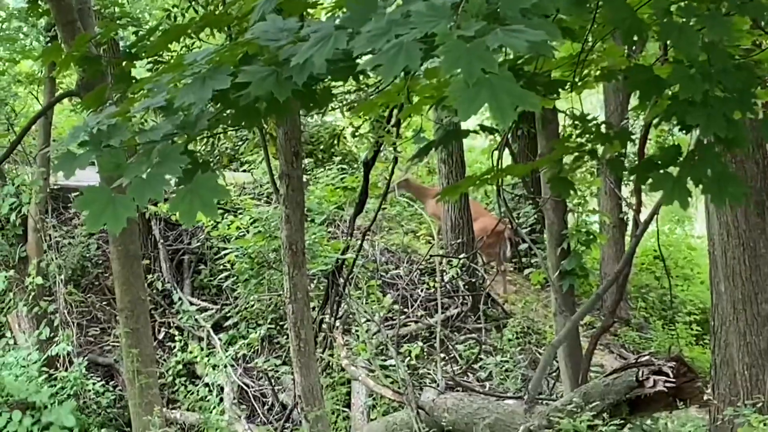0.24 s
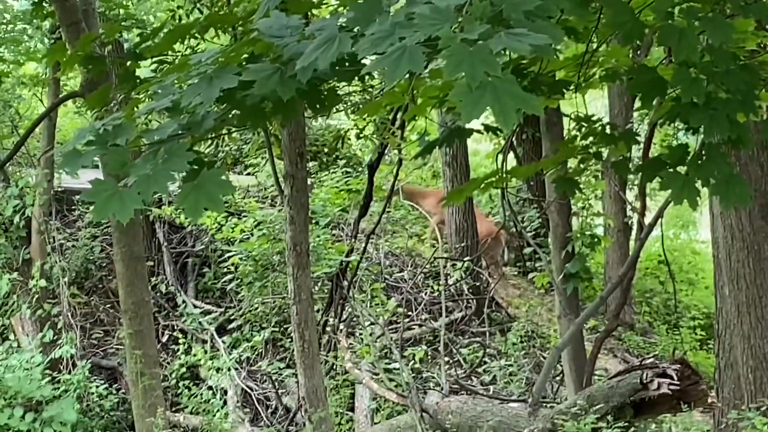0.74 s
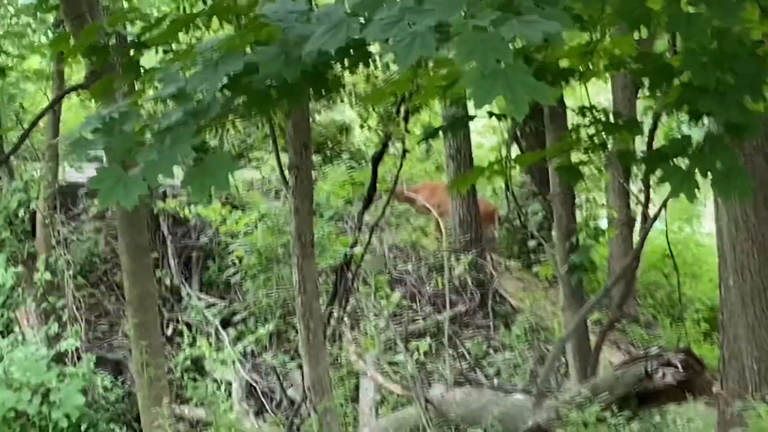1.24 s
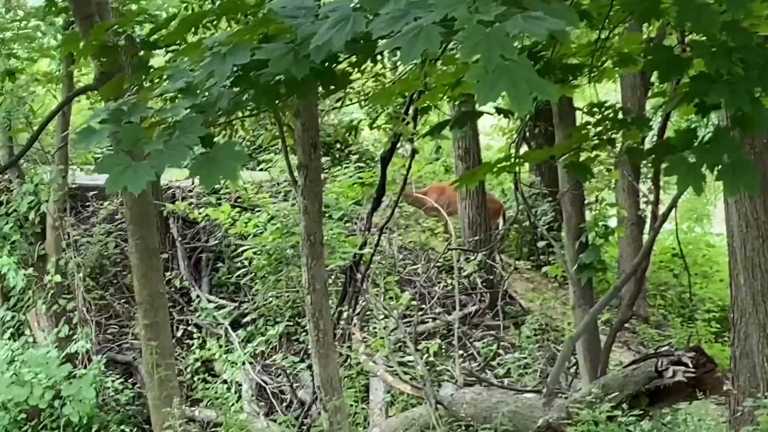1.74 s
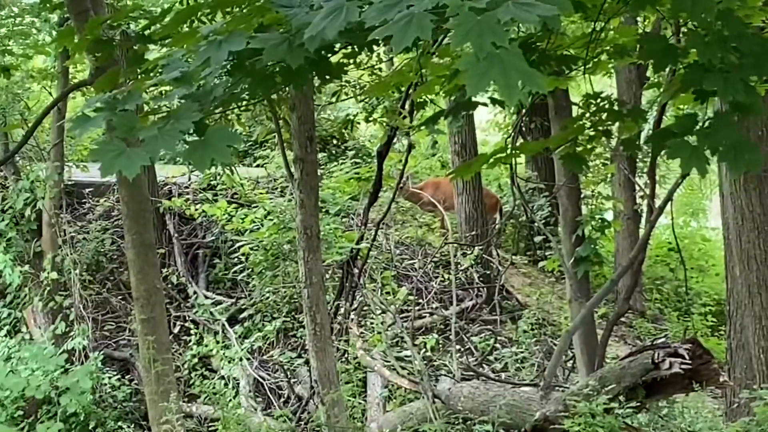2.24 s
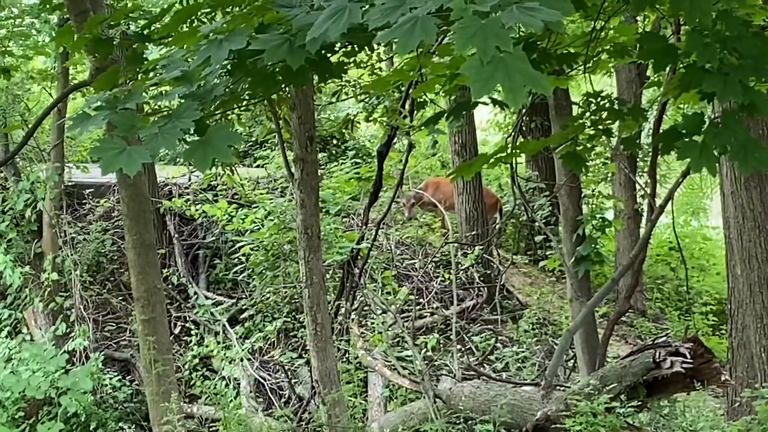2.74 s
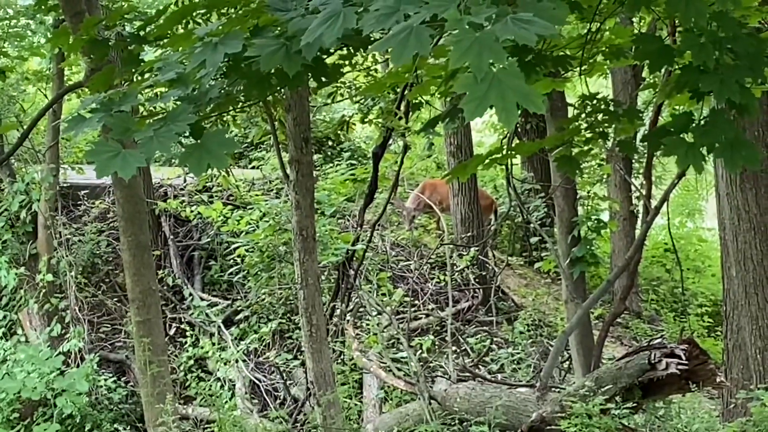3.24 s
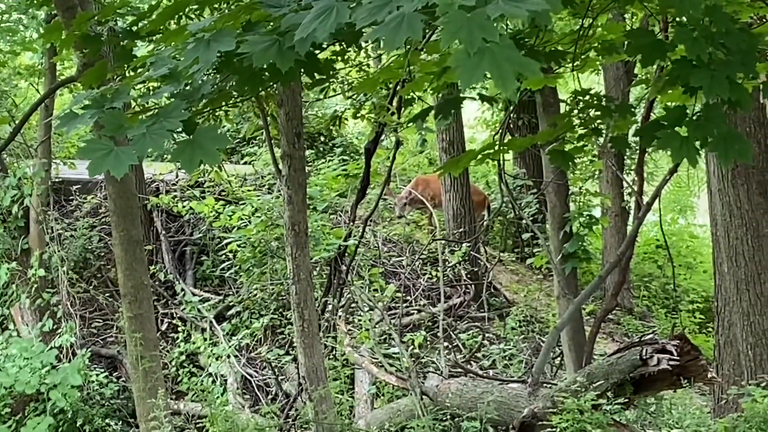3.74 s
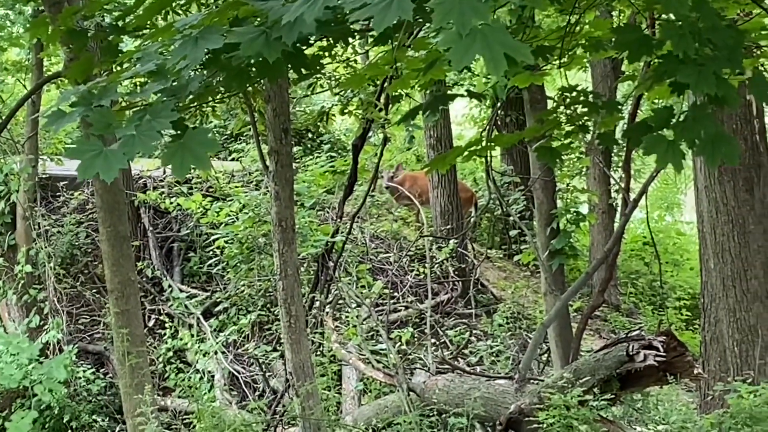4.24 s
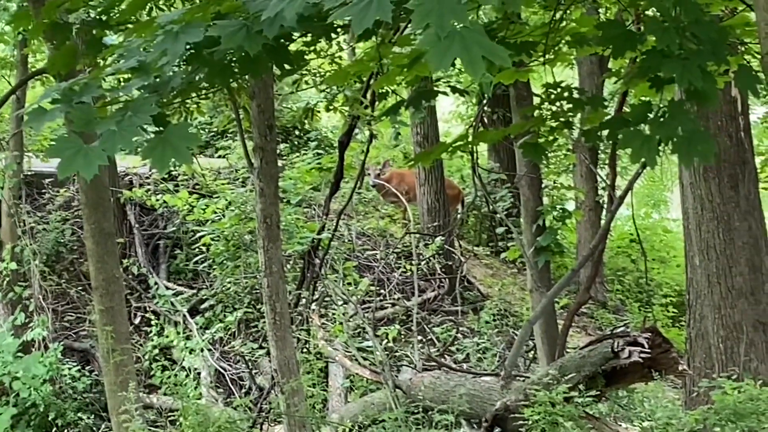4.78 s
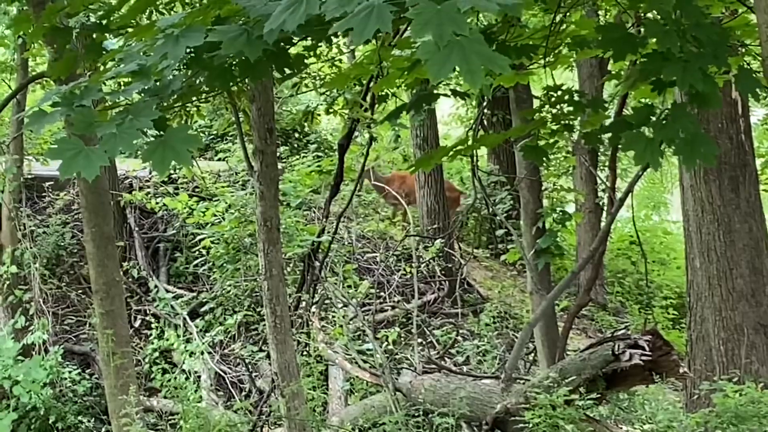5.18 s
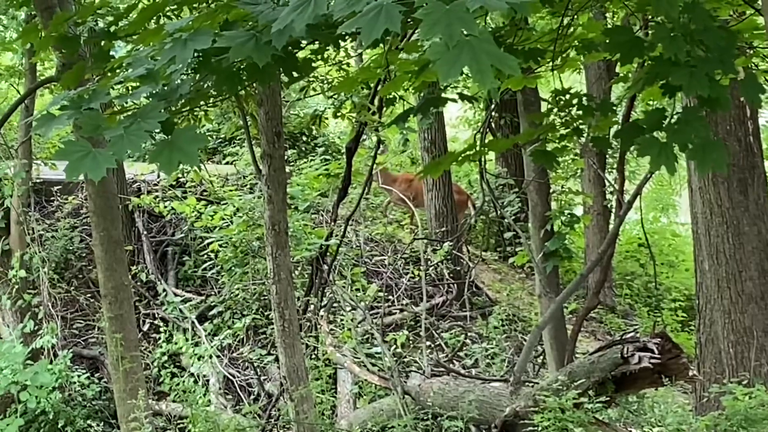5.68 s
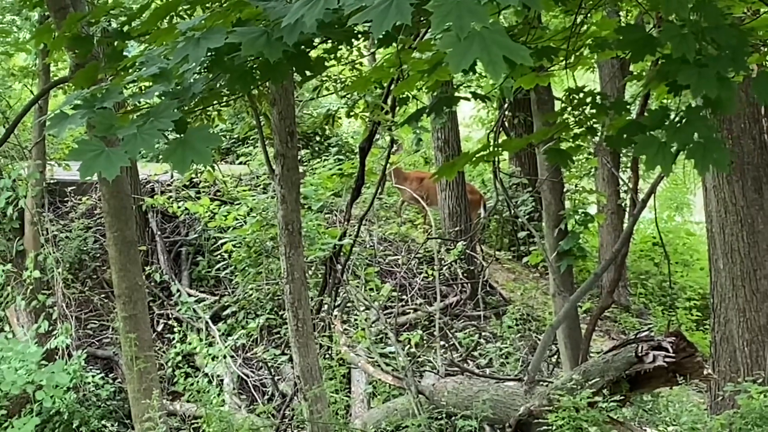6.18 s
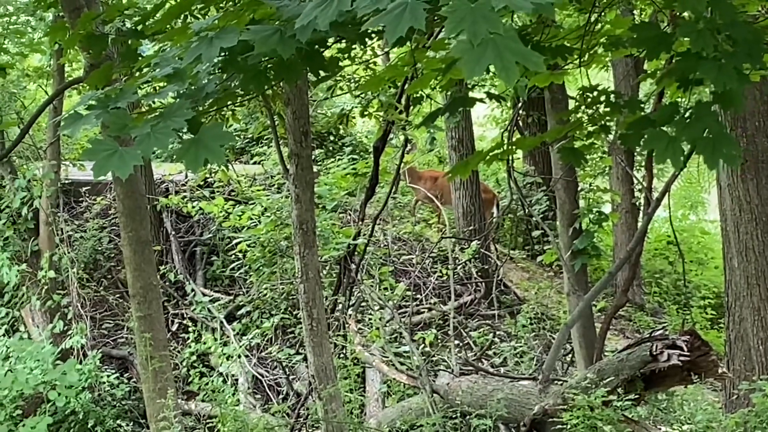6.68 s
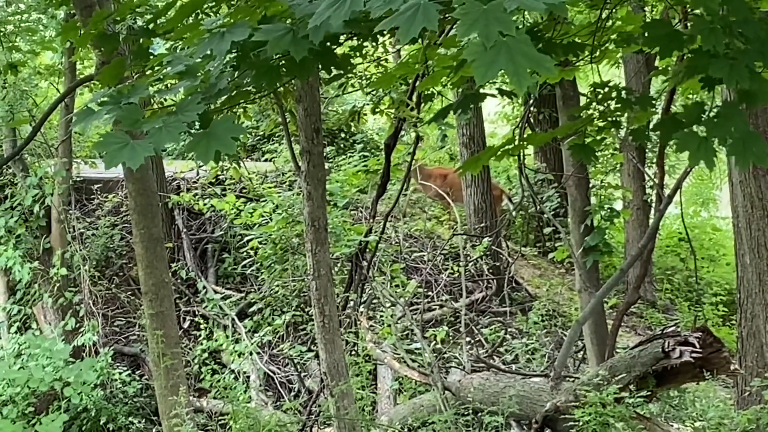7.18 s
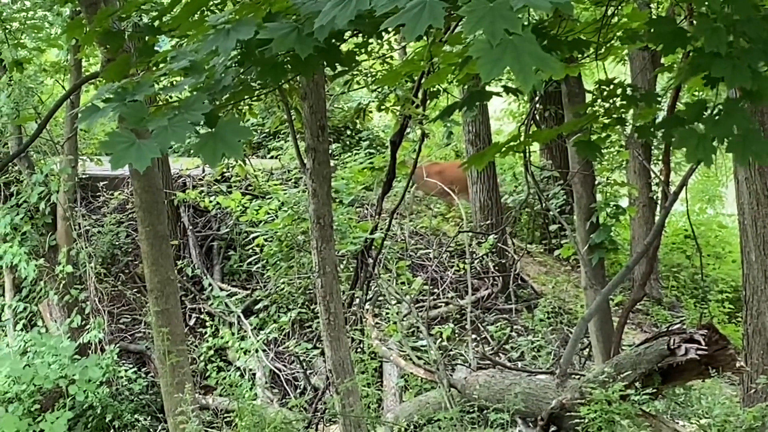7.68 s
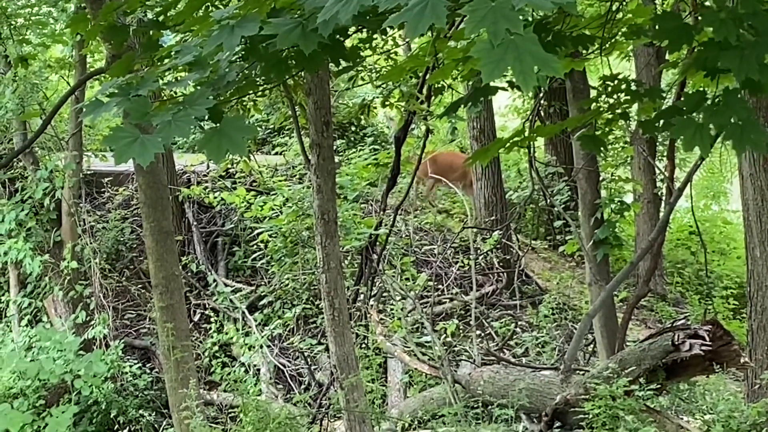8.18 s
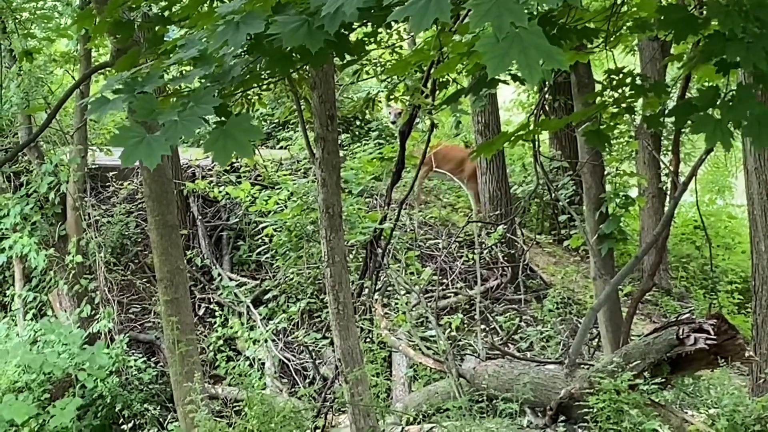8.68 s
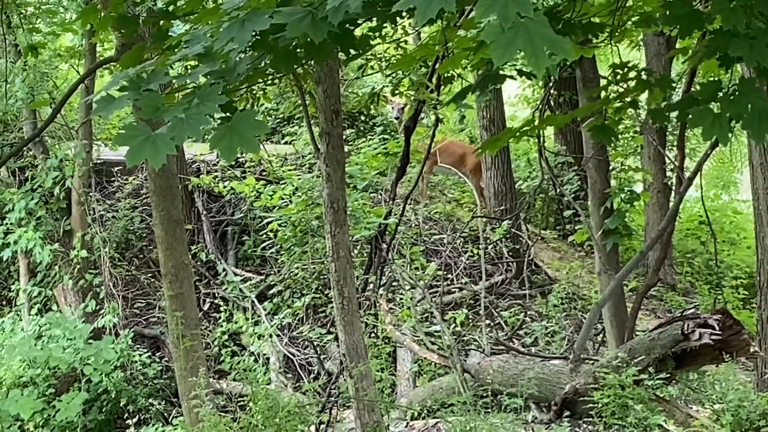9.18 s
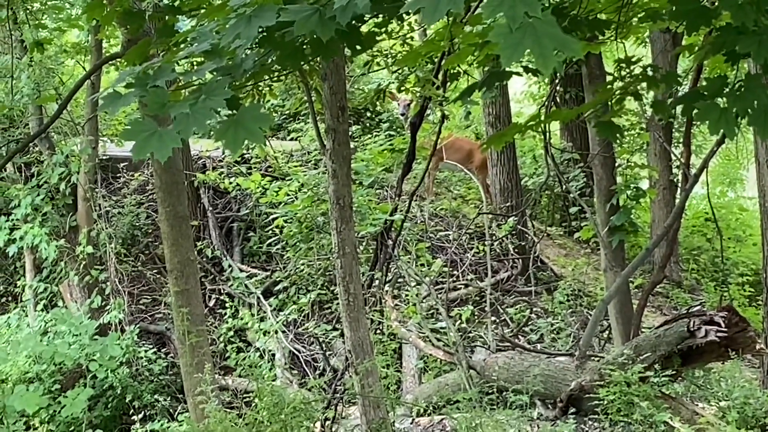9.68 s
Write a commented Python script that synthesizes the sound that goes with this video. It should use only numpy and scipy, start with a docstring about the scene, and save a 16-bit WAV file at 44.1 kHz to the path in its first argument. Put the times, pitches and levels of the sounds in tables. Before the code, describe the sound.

Leafy woods with sparrow-like cheeps and warbled whistles, a sharp handling knock near the start, and a low motor hum growing later.

```python
"""Small birds sing among trees: frequency-modulated sines give rough sparrow calls, clear whistles and
glides, all smeared by sparse decaying echoes off the trunks. An insect shrills as a narrow noise band.
Shaped noise makes far traffic and a wooded hiss; two wavering sines make an engine, louder as it nears.
A hand knocks the body of the phone: dispersed pulses and ringing modes, with rubbing noise around them."""
import sys
import numpy as np
from scipy import signal
from scipy.fft import rfft, irfft, next_fast_len
from scipy.io import wavfile
from scipy.ndimage import uniform_filter1d

SR = 44100
rng = np.random.default_rng(int(sys.argv[2]) if len(sys.argv) > 2 else 0)


def to_wav(sig):
    """Store sig (one row per channel, or 1-D mono) as 16-bit WAV at the path in sys.argv[1].

    Samples outside -1..1 are clipped; the rate is SR.
    """
    pcm = np.clip(np.atleast_2d(sig), -1, 1) * 32767
    pcm = np.round(pcm).astype(np.int16)
    wavfile.write(sys.argv[1], SR, pcm.T)  # frames by channels


N = 437472


def gain_of(db):
    """Logarithmic level: decibels to amplitude gain."""
    return 10 ** (np.asarray(db) / 20)


def evened(x):
    """Normalization: scales to rms 1."""
    return x / np.sqrt(np.mean(x ** 2) + 1e-20)


def read(points, hz):
    """Interpolation of a spectrum in dB on a log-frequency axis."""
    point_hz, value = np.transpose(points)
    return np.interp(np.log(hz + 1), np.log(point_hz + 1), value)


def curves(rows):
    """Linear interpolation of a table's columns at every sample."""
    seconds, *columns = np.transpose(rows)
    return [np.interp(np.arange(N) / SR, seconds, column) for column in columns]


def colour(x, points):
    """Linear filtering: multiplies the spectrum by a response, without phase shift."""
    response = gain_of(read(points, np.fft.rfftfreq(N, 1 / SR)))
    return irfft(rfft(x) * response, N)


def add(mix, start_s, sound):
    """Superposition: mixes a sound in at a time, cut off at the edges of the mix."""
    at = round(start_s * SR)
    part = mix[max(at, 0):][:len(sound) + min(at, 0)]
    part += sound[max(-at, 0):][:len(part)]


def wobble(count, smooth_s):
    """Low-passed noise: a smooth random curve of rms 1."""
    size = max(round(smooth_s * SR), 1)
    once = uniform_filter1d(rng.standard_normal(count), size)
    return evened(uniform_filter1d(once, size))


def power_of(points, hz, db):
    """Power spectral density of a given shape, scaled to a total level over time."""
    shape = gain_of(read(points, hz)) ** 2
    return shape[:, None] / shape.sum() * gain_of(db) ** 2


LONGEST = SR  # samples of noise drawn for each note, enough for the longest


def voice(rows, warble, hiss_db, overtones=()):
    """Frequency modulation: a sine on a randomly warbled pitch curve; a faint broad hiss follows the note."""
    seconds, hz, db = np.transpose(rows)
    t = np.arange(seconds[0], seconds[-1], 1 / SR)
    shake = wobble(LONGEST, 0.0008)[:len(t)]
    hiss = np.diff(rng.standard_normal(LONGEST))[:len(t)]
    turns = np.cumsum(np.interp(t, seconds, hz) * (1 + warble * shake)) / SR
    tone = np.sin(2 * np.pi * turns)
    for multiple, overtone_db in overtones:
        tone = tone + gain_of(overtone_db) * np.sin(2 * np.pi * multiple * turns)
    fade = np.clip(np.minimum(t - seconds[0], seconds[-1] - t) / 0.0011, 0, 1)
    level = np.sqrt(2) * gain_of(np.interp(t, seconds, db))
    return level * (tone + gain_of(hiss_db) * hiss) * fade


# harmonics of the rough calls: multiple, level_db relative to the fundamental
OVERTONES = [(2, -22.5), (3, -41)]


def calls(shape, events, warble, hiss_db):
    """Scaling of one call: each repeat has its own strength, pitch and speed, on three perches in turn."""
    out = np.zeros((3, N))
    for k, (start_s, db, pitch, speed) in enumerate(events):
        rows = np.array(shape) * [1 / speed, pitch, 1] + [0, 0, db]
        add(out[k % len(out)], start_s, voice(rows, warble, hiss_db, OVERTONES))
    return out


# pitch and level contour of a cheep: time_s, pitch_hz, level_db (relative; repeats rescale all three)
CHEEP_SHAPE = [(0, 4030, -10), (.015, 5160, -8), (.05, 4730, -6.5), (.1, 4230, -4), (.15, 3720, -17),
               (.17, 3470, -3)]
# cheeps: start_s, level_db, pitch_factor, speed_factor
CHEEP_CALLS = [(-.08, -51.5, 1.04, 1.3), (1.645, -50.5, 0.95, 1.35), (2.304, -51.5, 0.95, 1.15),
               (3.77, -51.5, 0.94, 1.13), (5.371, -51, 0.96, 1.47), (8.015, -53.5, 0.93, 1.07),
               (8.8, -55, 0.91, 0.84), (8.931, -58, 0.95, 1.6), (9.82, -54.5, 0.95, 1.3)]


def cheeps():
    """Strong random frequency modulation spreads each harmonic into a rough band."""
    return calls(CHEEP_SHAPE, CHEEP_CALLS, warble=0.09, hiss_db=-30.5)


# insect noise band: time_s, level_db, centre_hz
INSECT_BAND = [(0, -80, 5700), (.4, -81.5, 5670), (1.5, -81.5, 5700), (3, -82.5, 5750), (4.5, -79, 5750),
               (6, -80, 5830), (7, -80, 5850), (8.5, -83.5, 5940), (9.92, -76, 5850)]


def insect():
    """Quadrature modulation: slow noise on a cosine and a sine makes a narrow band at a drifting centre."""
    db, hz = curves(INSECT_BAND)
    turns = np.cumsum(hz) / SR
    band = wobble(N, 0.0011) * np.cos(2 * np.pi * turns)
    band += wobble(N, 0.0033) * np.sin(2 * np.pi * turns)
    return gain_of(db) * np.array([band, band[::-1]])  # time reversal decorrelates the second part


# engine level: time_s, first_order_db, second_order_db
ENGINE_LEVELS = [(0, -54, -62.5), (1.05, -50, -72.5), (1.7, -60.5, -62), (2.13, -54, -86), (3.4, -64, -81),
                 (4.4, -54.5, -64), (5.45, -61, -69), (6.2, -50.5, -61), (6.42, -42.5, -57),
                 (6.85, -50, -61.5), (7.18, -48.5, -65), (7.76, -41.5, -66), (8.07, -44.5, -66),
                 (8.4, -39.5, -69), (8.9, -43, -71), (9.3, -50.5, -68), (9.67, -44.5, -67),
                 (9.92, -54, -69)]
# engine firing rate before its random wobble: time_s, rate_hz
FIRING_RATE = [(0, 96.5), (3.7, 94), (5.5, 97), (6.7, 99.5), (7.8, 98), (8.5, 95.3), (9.2, 93.2),
               (9.92, 91)]


def engine():
    """Harmonic excitation: firing rate and its double, wavering on their way through the air."""
    first_db, second_db = curves(ENGINE_LEVELS)
    turns = np.cumsum(curves(FIRING_RATE)[0] * (1 + 0.0067 * wobble(N, 0.048))) / SR
    waver = gain_of(1.7 * wobble(N, 0.028) + 0.87 * wobble(N, 0.12))
    first = gain_of(first_db) * waver
    second = gain_of(second_db) * waver[::-1]
    orders = [first * wave(2 * np.pi * turns) + second * wave(4 * np.pi * turns)
              for wave in (np.sin, np.cos)]
    return np.sqrt(2) * np.array(orders)


# far traffic level: time_s, rumble_db, wash_db
TRAFFIC_LEVELS = [(0, -44, -53), (.35, -51.5, -55.5), (1.4, -39.5, -55), (1.8, -46.5, -64.5),
                  (2.2, -47.5, -60), (2.8, -45, -54), (3.4, -48.5, -56.5), (4.1, -52, -56.5),
                  (5.1, -48, -55), (5.7, -54, -54.5), (6.4, -45.5, -53.5), (6.75, -39.5, -55),
                  (7.5, -40, -53), (8.8, -40, -56.5), (9.92, -39.5, -56)]
# relative spectral density of rumble and of wash: frequency_hz, density_db
RUMBLE_SPECTRUM = [(15, -51.5), (30, -24), (42, 0.5), (60, -2.5), (80, -4), (140, -21), (300, -31.5),
                   (2000, -110)]
WASH_SPECTRUM = [(60, -28.5), (130, 2.5), (190, -3.5), (290, -11.5), (650, -10.5), (1000, -21.5),
                 (1500, -49.5), (2500, -40), (6000, -100)]
# far chorus and leaves blurred to a hiss, relative density: frequency_hz, density_db
HISS_SPECTRUM = [(900, 1), (1500, -6), (2200, -3.5), (2800, -3.5), (4000, -9.5), (5100, -17), (6400, -23),
                 (7300, -17.5), (7800, -22), (9800, -35.5), (12000, -27), (14000, -47.5)]


def background():
    """Random-phase synthesis: Gaussian short-time spectra for rumble, wash and hiss, in drifting patches."""
    hz = np.fft.rfftfreq(1024, 1 / SR)
    a, b, c, d, patches = rng.standard_normal((N // 256 + 5, 513, 5)).T
    seconds, rumble_db, wash_db = np.transpose(TRAFFIC_LEVELS)
    t = np.arange(a.shape[1]) * 256 / SR
    power = power_of(RUMBLE_SPECTRUM, hz, np.interp(t, seconds, rumble_db))
    power += power_of(WASH_SPECTRUM, hz, np.interp(t, seconds, wash_db))
    power = power + power_of(HISS_SPECTRUM, hz, -63)
    patches = uniform_filter1d(patches, size=10, axis=0)  # across frequency
    patches = evened(uniform_filter1d(patches, size=16, axis=1))  # across time
    noise = np.array([a + 1j * b, c + 1j * d])
    spectra = noise * np.sqrt(power / 2) * gain_of(2.23 * patches)
    return signal.istft(spectra, nperseg=1024, noverlap=768)[1][:, :N]


def note(start_s, seconds, hz, db):
    """Near-pure tone: start and sound of a clear note with faint warble and very little hiss."""
    return start_s, voice(np.transpose([seconds, hz, db]), warble=0.0073, hiss_db=-47.0)


# held peeps: start_s, length_s, pitch_hz, level_db (at the peak)
PEEPS = [(.03, 0.06, 5780, -47.5), (.9, 0.14, 7120, -70.5), (4.215, 0.033, 3603, -53.5),
         (4.348, 0.04, 3270, -58.5), (5.21, 0.12, 3950, -67), (5.64, 0.27, 3870, -68),
         (5.99, 0.28, 3845, -67), (6.27, 0.3, 5330, -73.5), (6.6, .27, 5260, -73), (7.6, 0.54, 3665, -64),
         (7.88, 0.071, 5450, -61.5), (8.14, 0.13, 5380, -57.5), (8.3, 0.031, 2190, -61.5),
         (8.44, 0.084, 5250, -65), (8.62, 0.11, 3190, -60), (8.66, .09, 5250, -64),
         (8.72, 0.15, 2670, -58.5), (9.48, 0.04, 2204, -56.5), (9.57, 0.074, 1983, -68),
         (9.5, .06, 3160, -61), (9.53, 0.053, 4477, -52), (9.82, 0.019, 4470, -46)]
PEEP_RISE_S, PEEP_START_DB, PEEP_FADE_DB = 0.011, -8.5, -13.5  # levels relative to the peak
PEEP_SAG = 0.008  # share of the pitch lost by the end


def peeps():
    """Amplitude envelope: a steady tone swells fast, then fades while its pitch sags."""
    return [note(start_s, [0, PEEP_RISE_S, length_s], [hz, hz, hz * (1 - PEEP_SAG)],
                 [db + PEEP_START_DB, db, db + PEEP_FADE_DB])
            for start_s, length_s, hz, db in PEEPS]


# contour of a low chuck: time_s, pitch_hz, level_db (relative; repeats rescale all three)
CHUCK_SHAPE = [(0, 3295, -6), (.01, 2705, 9), (.03, 2100, 5), (.055, 1796, -5)]
# chucks: start_s, level_db, pitch_factor, speed_factor
CHUCK_CALLS = [(0.091, -76, 0.91, 2.4), (.76, -65.5, 1.07, 1.12), (2.97, -67.5, 0.92, 1.17),
               (4.56, -72, 1.1, 1.1), (5.679, -71, 1.11, 1.08), (6.372, -68, 1.21, 1.05),
               (6.459, -83, 1.5, 1.45), (6.63, -63, 1.2, 1.01), (7.429, -64, 1.1, 0.98),
               (8.852, -64, 1.42, 1.01), (9.502, -62, 1.14, 1.1)]


def chucks():
    """Very strong random frequency modulation turns a short falling tone almost to noise."""
    return calls(CHUCK_SHAPE, CHUCK_CALLS, warble=0.17, hiss_db=-35)


# knocks, relative level of each part: start_s, blow_db, thump_db, rattle_db, tick_db
KNOCKS = [(0.309, -77, -54, -47.5, -39.5), (0.557, -49, -55, -69, -61), (0.947, -22, -35, -39, -64),
          (0.97, -44, -53, -41, -78), (1.003, -48, -57, -49, -69), (1.181, -28.5, -36, -61, -56),
          (1.215, -3, -18, -17, -31), (1.369, -41.5, -61, -53, -62), (1.452, -43, -41, -70, -73),
          (1.519, -40.5, -35, -48.5, -67), (1.556, -32, -50.5, -40.5, -63), (1.667, -17.5, -29, -23.5, -54),
          (1.748, -70, -56, -54, -51), (2.585, -31, -48.5, -45, -73), (2.772, -57, -39, -70, -79),
          (2.798, -55, -41, -56, -80), (3, -48, -45, -37, -72), (3.061, -43.5, -44, -68, -68),
          (3.078, -30.5, -31.5, -64, -70), (3.098, -54, -34.5, -72, -75), (3.133, -70, -36, -72, -75),
          (3.172, -70, -42.5, -72, -75), (3.522, -26, -41, -45, -62)]
# what each part sends through the body, relative: frequency_hz, level_db
THUMP = [(30, 4.3), (75, 20.6), (140, 14.9)]
BLOW = [(280, 2), (560, -3.5)]
RATTLE = [(950, 3.5), (1250, -8)]
TICK = [(1850, -2), (2600, -14), (4300, -16.5), (7000, -23), (14000, -40)]
# modes left ringing by blow and rattle: frequency_hz, level_db (relative to the part), t60_s
BLOW_MODES = [(294, -5, 0.021), (574.5, -7, 0.033)]
RATTLE_MODES = [(827, 1.5, 0.019), (977, -1, 0.029)]
DULLING = 0.2  # dB of top treble a knock loses for each dB its blow is weaker


def knocks():
    """Dispersion: bending waves carry treble first and bass later; damped modes ring on."""
    out = np.zeros(N)
    t, hz = np.arange(8192) / SR, np.fft.rfftfreq(8192, 1 / SR)
    late = np.exp(-2j * np.pi * 1.409 * np.log(1 + hz))  # each frequency comes 1.409 of its cycles late
    for start_s, blow_db, thump_db, rattle_db, tick_db in KNOCKS:
        parts = (THUMP, thump_db), (BLOW, blow_db), (RATTLE, rattle_db), (TICK, tick_db)
        shock = [(f, db + part_db) for points, part_db in parts for f, db in points]
        dull_db = DULLING * blow_db * np.clip(hz / 2500 - 1, 0, 1)
        pulse = irfft(gain_of(read(shock, hz) + dull_db) * late)
        add(out, start_s, 40 * pulse * np.clip(2 - t / 0.093, 0, 1))
        for modes, part_db in (BLOW_MODES, blow_db), (RATTLE_MODES, rattle_db):
            for f, db, t60 in modes:
                decay = gain_of(part_db + db - 60 * t / t60)
                onset = 1 - np.exp(-t * f / 1.1)
                add(out, start_s, decay * onset * np.sin(2 * np.pi * f * t))
    return out


# contour of a chirrup: time_s, pitch_hz, level_db (relative; repeats rescale all three)
CHIRRUP_SHAPE = [(0, 4900, -24), (.025, 5365, -5), (.031, 4000, -7), (.045, 4600, -1), (.062, 4200, 1.5),
                 (.076, 4300, 1), (.082, 3450, 0.5), (.11, 2792, -2.5), (.14, 3293, -3), (.165, 2806, -8),
                 (.185, 2972, -22)]
# chirrups: start_s, level_db, pitch_factor, speed_factor
CHIRRUP_CALLS = [(.558, -58, 1.0, 0.88), (2.955, -58, 0.97, 0.88), (4.551, -58, 1.01, 1.01),
                 (6.553, -60.5, 0.99, 0.83)]


def chirrups():
    """Random frequency modulation roughens a longer call whose pitch zigzags downward."""
    return calls(CHIRRUP_SHAPE, CHIRRUP_CALLS, warble=0.045, hiss_db=-33.0)


# rubbing noise around knocks, one a short swell into the loudest: start_s, length_s, start_db, end_db
RUBS = [(0.932, 0.05, -47, -57), (1.148, 0.047, -51, -43), (1.198, .015, -46.5, -18),
        (1.224, 0.08, -36.5, -49), (1.624, .046, -51, -44), (1.681, 0.051, -36, -60)]
# relative spectral density of the rubbing: frequency_hz, density_db
RUB_SPECTRUM = [(60, -8), (200, 0.5), (550, 4), (950, -6), (1300, -15.5), (2200, -27), (6000, -62)]


def rubbing():
    """Amplitude-modulated noise: coloured noise whose strength flutters at random, in short ramps."""
    out = np.zeros(N)
    flutter = gain_of(4.3 * wobble(N, 0.0057))
    rub = evened(colour(rng.standard_normal(N) * flutter, RUB_SPECTRUM))
    for start_s, length_s, start_db, end_db in RUBS:
        at = np.arange(round(start_s * SR), round((start_s + length_s) * SR))
        level = gain_of(np.linspace(start_db, end_db, len(at)))
        out[at] += rub[at] * level * signal.windows.tukey(len(at), 0.2)
    return out


# long falling glides: start_s, length_s, top_hz, bottom_hz, level_db (at the peak)
GLIDES = [(1.113, 0.54, 6130, 3668, -57), (1.925, 0.32, 4640, 3145, -53), (7.188, 0.45, 6110, 3660, -55)]
GLIDE_DROP, GLIDE_DROP_S = 0.52, 0.0098  # share of the fall done at once, its time constant
GLIDE_SETTLE = 0.75  # share of the length before the pitch is level
GLIDE_START_DB, GLIDE_END_DB = -9.5, -15.5  # relative to the peak


def glide(start_s, length_s, top_hz, bottom_hz, db):
    """Exponential plus linear fall: drops fast, slides to a level pitch, loudest where it settles."""
    u = np.linspace(0, 1, 40)
    fast = GLIDE_DROP * np.exp(-u * length_s / GLIDE_DROP_S)
    slow = (1 - GLIDE_DROP) * np.maximum(1 - u / GLIDE_SETTLE, 0)
    hz = bottom_hz + (top_hz - bottom_hz) * (fast + slow)
    swell_db = np.interp(u, [0, GLIDE_SETTLE, 1], [GLIDE_START_DB, 0, GLIDE_END_DB])
    return note(start_s, u * length_s, hz, db + swell_db)


# warbled song: start_s, start_hz, turn_s (after the start), turn_hz, length_s, end_hz, level_db (at the turn)
SYLLABLES = [(2.805, 2920, 0.024, 2720, 0.055, 3020, -61.5), (2.839, 2950, .025, 3010, 0.077, 3000, -57),
             (2.915, 3050, .015, 3050, .04, 3100, -62.5), (2.897, 1900, 0.013, 2200, 0.037, 2910, -67),
             (3.23, 2904, 0.025, 2716, 0.046, 2970, -56), (3.267, 2990, 0.016, 3054, 0.035, 3050, -54),
             (3.308, 1842, .03, 3110, .07, 2990, -58), (3.394, 3104, 0.029, 2740, .055, 2240, -53.5),
             (3.731, 2840, 0.038, 2987, 0.06, 2765, -49.5), (3.798, 2770, .015, 2720, .035, 2860, -54.5),
             (3.869, 3200, 0.045, 2073, 0.051, 2410, -50), (4.25, 2820, 0.037, 2237, 0.051, 2280, -53.5),
             (4.315, 3610, 0.013, 3470, 0.044, 3240, -64), (4.827, 3810, 0.004, 3900, 0.0082, 3710, -61),
             (4.92, 3980, .015, 4300, 0.031, 4670, -69.5), (8.128, 1833, 0.05, 2110, 0.058, 1960, -61.5),
             (8.534, 4140, 0.011, 3127, 0.12, 2995, -56), (8.59, 3060, 0.05, 2643, .11, 2575, -56.5),
             (8.707, 2600, 0.046, 1940, .07, 2180, -61), (8.747, 5070, 0.022, 4090, 0.028, 3770, -52),
             (9.126, 3730, 0.024, 3515, 0.045, 2330, -55.5), (9.159, 2320, .012, 2150, 0.047, 2100, -56.5),
             (9.232, 2110, .02, 2350, 0.039, 2610, -53.5), (9.282, 3126, 0.039, 2830, 0.063, 2540, -54),
             (9.348, 2550, 0.012, 2474, 0.029, 2290, -53), (9.712, 3010, 0.032, 3220, 0.052, 3180, -58),
             (9.77, 2580, 0.018, 2200, 0.04, 2230, -52.5), (9.864, 2387, 0.012, 2270, 0.037, 2240, -58.5)]
SYLLABLE_START_DB, SYLLABLE_END_DB = -2, 1.5  # relative to the turn


def syllables():
    """Piecewise-linear frequency sweep: each syllable has a single turn in its pitch."""
    return [note(start_s, [0, turn_s, length_s], [start_hz, turn_hz, end_hz],
                 [db + SYLLABLE_START_DB, db, db + SYLLABLE_END_DB])
            for start_s, start_hz, turn_s, turn_hz, length_s, end_hz, db in SYLLABLES]


def shaped(shape, events):
    """Scaling of one clear contour in level, pitch and speed."""
    seconds, hz, shape_db = np.transpose(shape)
    return [note(start_s, seconds / speed, hz * pitch, shape_db + db)
            for start_s, db, pitch, speed in events]


# contour of a soft rising whistle: time_s, pitch_hz, level_db (relative; repeats rescale all three)
RISE_SHAPE = [(0, 2430, -4), (.15, 2704, 4.5), (.28, 2780, -18)]
# rising whistles: start_s, level_db, pitch_factor, speed_factor
RISE_CALLS = [(5.04, -74, 1, 1.25), (5.33, -69, 1.04, 1.15), (5.651, -68.5, 1.03, 1.04),
              (5.982, -70.5, 1, 1.1), (8.201, -67.5, 1.02, 1.8)]


def rises():
    """Slow upward frequency sweep at a soft level."""
    return shaped(RISE_SHAPE, RISE_CALLS)


# contour of a steep swoop: time_s, pitch_hz, level_db (relative; repeats rescale all three)
SWOOP_SHAPE = [(0, 5680, -2.5), (.04, 7460, -6), (.068, 6440, -7), (.08, 5400, 0), (.097, 4050, -17.5),
               (.14, 4980, -9.5), (.175, 5240, -11)]
# swoops: start_s, level_db, pitch_factor, speed_factor
SWOOP_CALLS = [(7.756, -62.5, 0.91, 1), (8.011, -51.5, 1.015, 0.96), (8.254, -47.5, .99, .99),
               (8.505, -46.5, 1.007, 1)]


def swoops():
    """Fast frequency sweep: up, steeply down and up again."""
    return shaped(SWOOP_SHAPE, SWOOP_CALLS)


def whistles():
    """Superposition of the clear notes, dealt in turn to three perches."""
    out = np.zeros((3, N))
    notes = peeps() + [glide(*row) for row in GLIDES] + syllables() + rises() + swoops()
    for k, (start_s, sound) in enumerate(notes):
        add(out[k % len(out)], start_s, sound)
    return out


def trees(perches, t60, rise_s):
    """Multiple scattering: sparse decaying echoes, one set per perch and one for the stereo difference."""
    taps, t = np.zeros((4, SR)), np.arange(SR) / SR
    at = np.arange(40, SR - 20, 20) + rng.integers(0, 20, (4, (SR - 41) // 20))  # one in 20 samples
    np.put_along_axis(taps, at, rng.choice([-1., 1.], at.shape), 1)
    taps *= gain_of(-60 * t / t60) * (1 - np.exp(-t / rise_s))
    taps /= np.linalg.norm(taps[0])
    size = next_fast_len(N + SR)
    heard, echoes = rfft(perches, size), rfft(taps, size)
    shared = (heard * echoes[:-1]).sum(0)
    apart = heard.sum(0) * echoes[-1]
    return irfft([shared, apart], size)[:, :N]


# what foliage lets through on the direct path: frequency_hz, level_db
LEAVES = [(2000, -2.5), (3300, -4), (4200, -7.5), (7000, -19)]
# what trunks and leaves scatter, high notes most: frequency_hz, level_db
SCATTER = [(2000, -6.5), (3200, -2.5), (4200, -0.5), (7000, -1.5)]


def birds():
    """Direct and reverberant sound: calls come mostly as echoes; the chucks are nearer and drier."""
    clear = whistles()
    rough = cheeps() + chirrups()
    near = chucks()
    scattered = colour(clear, SCATTER) + gain_of(5.0) * rough + gain_of(1.0) * near
    out = trees(scattered, t60=0.73, rise_s=0.0011)
    direct = colour(clear.sum(0), LEAVES) + gain_of(-1.5) * rough.sum(0) + near.sum(0)
    out[0] += direct
    return out


def handling():
    """Phase quadrature: the stereo difference of knocks and rubbing lags by a quarter cycle."""
    touch = knocks() + rubbing()
    return np.array([touch, irfft(-1j * rfft(touch), N)])


# stereo width by frequency, wide near 1.4 kHz, almost mono from 4 to 6.5 kHz: frequency_hz, level_db
STEREO_WIDTH = [(60, -24.5), (170, -12), (490, -11.5), (840, -6.5), (1410, 3.5), (2000, -10.5),
                (2600, -11.5), (4060, -33.5), (6500, -53), (7800, 1)]


def scene():
    """Sum and difference stereo: a part shared by both channels, and a part of opposite sign."""
    shared, apart = birds() + insect() + engine() + background() + handling()
    apart = colour(apart, STEREO_WIDTH)
    return np.array([shared + apart, shared - apart])


# overall tone, thin deep bass, a narrow gap near 9 kHz, weak above 13 kHz: frequency_hz, level_db
OVERALL_TONE = [(15, -27), (32, -11), (50, 0), (6000, 0.5), (7400, -4), (7800, -4), (8600, -7.5),
                (9050, -39), (9700, 1.5), (12200, -1.5), (13000, -22), (15000, -19.5)]
EDGE_HZ = 15300  # upper band limit


def record(dry):
    """Linear filtering and band limiting: sets the overall tone, then a low-pass cuts the extreme top."""
    edge = signal.firwin(255, EDGE_HZ, window=("kaiser", 9), fs=SR)
    return signal.oaconvolve(colour(dry, OVERALL_TONE), edge[None], "same")


dry = scene()
out = record(dry)
to_wav(out)
```